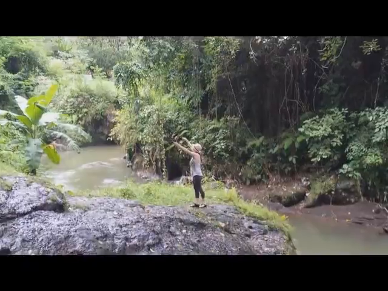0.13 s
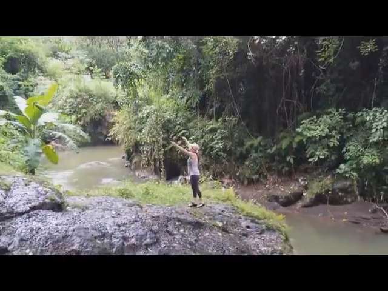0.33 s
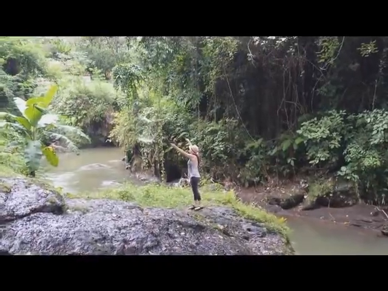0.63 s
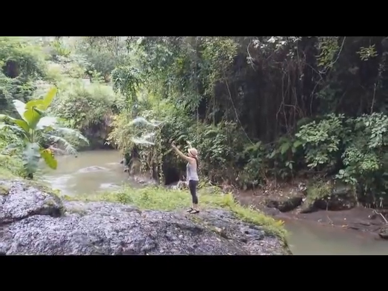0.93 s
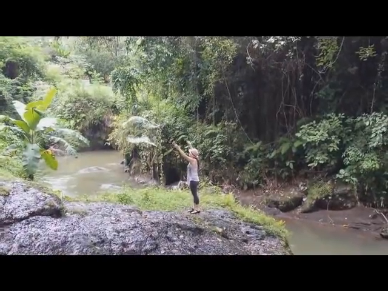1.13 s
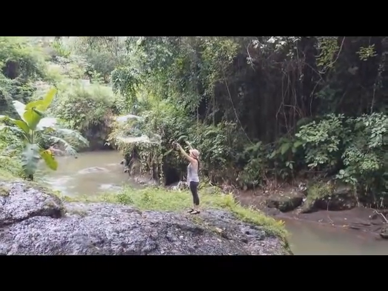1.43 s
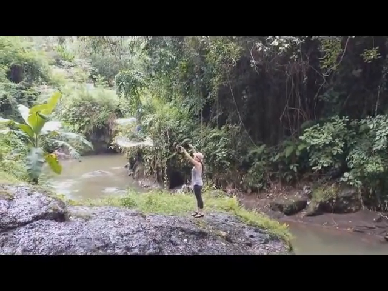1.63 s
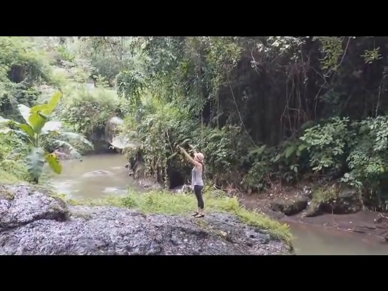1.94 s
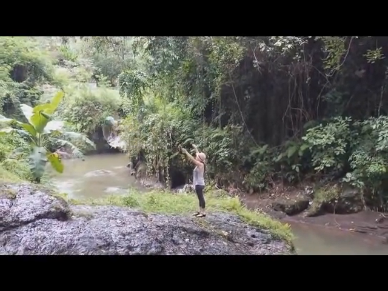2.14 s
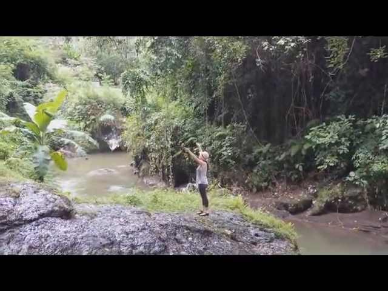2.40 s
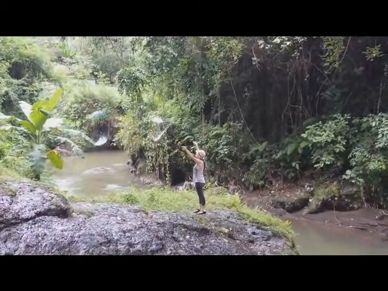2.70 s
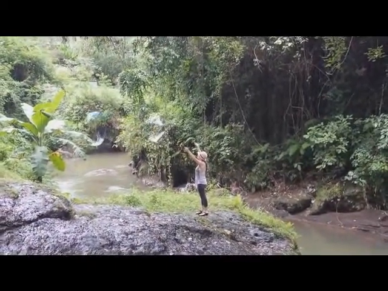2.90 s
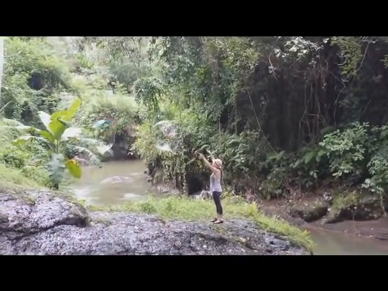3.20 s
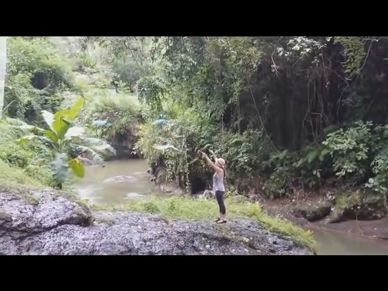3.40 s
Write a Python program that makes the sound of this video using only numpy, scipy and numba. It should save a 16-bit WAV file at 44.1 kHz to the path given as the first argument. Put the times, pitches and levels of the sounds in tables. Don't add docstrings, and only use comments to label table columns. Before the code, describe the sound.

A river rushes without pause through a leafy gorge, a dense wide roar with fine bubbly fizz. After about a second it brightens slightly; tiny splashes barely stand out. Wide stereo, handheld camera microphone.

```python
import sys
import numpy as np
from scipy import signal
from scipy.fft import rfft, irfft
from scipy.io import wavfile
from scipy.ndimage import uniform_filter1d
from numba import njit

SR = 44100
rng = np.random.default_rng(int(sys.argv[2]) if len(sys.argv) > 2 else 0)


def dump_mix(stems):
    frames = np.atleast_2d(stems).T
    limited = np.clip(frames, -1, 1)
    pcm = np.round(limited * 32767).astype(np.int16)
    wavfile.write(sys.argv[1], SR, pcm)


def volts_from_decibels(level):
    exponent = np.asarray(level, float) / 20
    return 10 ** exponent


N = 156555

# start in seconds, peak level in dB, centre in Hz.
SPLASH_EVENTS = [(.339, -24, 6500), (.499, -24, 7200), (.67, -26, 2300), (.9255, -17.5, 4800),
                 (.9305, -22, 4640), (1.249, -22, 6140), (1.64, -26.5, 3000), (1.649, -23, 7800),
                 (1.959, -21.5, 5020), (2.069, -17.5, 6440), (2.32, -19.5, 8500), (2.334, -21, 5550),
                 (2.864, -21, 8560), (2.959, -17.5, 5700), (3.074, -21, 5260), (3.272, -21.5, 8300),
                 (3.529, -17.5, 5450)]
# frequency in Hz, share 0-1.
UPSTREAM_SHARE = [(300, .05), (1400, 0.12), (1800, 0.41), (2200, 0.96), (6000, 0.72)]
# frequency in Hz, share 0-1.
DIRECT_SHARE = [(60, 0.69), (250, 0.92), (850, 0.61), (1400, 0.69), (2300, 0.57), (3600, 0.19), (6000, 0.3),
                (12000, 0.4)]
# frequency in Hz, gain in dB.
LEFT_COLOUR = [(170, -5), (1200, -5), (2100, -1), (3300, -8.5), (5000, 1), (6300, -0.5), (10300, -9.5),
               (12000, -10.5)]
# frequency in Hz, gain in dB.
RIGHT_COLOUR = [(150, -4.5), (700, -3), (1500, -5.5), (4000, -5), (6000, -2.5), (8400, 0.5), (10500, -2),
                (13000, -6)]
# frequency in Hz, gain in dB.
LEFT_BEFORE_BRIGHTENING = [(300, 0.5), (5000, -1), (7000, -0.5), (9000, -2.5), (12000, -5.5)]
# frequency in Hz, gain in dB.
RIGHT_BEFORE_BRIGHTENING = [(300, -1.1), (5000, -0.13), (8500, -0.37), (12000, -1.2)]
# time in seconds, share brightened 0-1.
BRIGHTENING = [
    (0, 0),
    (.6, 0.04),
    (.8, 0),
    (1.1, 0),
    (1.6, 0.77),
    (2.0, 1),
    (2.8, 0.72),
    (3.55, 0.8),
]
# time in seconds, level gap in dB.
MERGE_GAP = [(.67, 3), (1.4, 4.0), (1.93, 4.5), (1.96, 7), (3.55, 7.0)]

RIVER_DB, FIZZ_DB = -26.5, -4
SURGE_DB, PATCH_DB, FLICKER_DB = 0.23, 0.77, 1.6
BUBBLES_PER_S, CANDIDATES_PER_S = 3500, 4000
BUBBLE_CYCLES, BUBBLE_SPREAD_DB, BUBBLE_RISE_SHARE = 8, 1.88, 0.28
SPLASH_DB, SPLASH_DECAY_S, SPLASH_WIDTH_SHARE = -8, 0.012, 0.32
GULP_S, GULP_HZ, GULP_DB, GULP_DECAY_S = 1.961, 310, -30, 0.005
UP_LAG_S, DOWN_LAG_S = 0.00041, -0.00033
UP_LEAD_RAD = 0.9
BASS_CUT_HZ, BASS_SHELF_HZ, BASS_SHELF_DB = 73, 143, -3.5
OPEN_S, OPEN_RISE_S = 0.0368, 0.014
JOINT_HZ, CENTRE_TOP_HZ, TOP_HZ = 4000, 9700, 12980
MERGE_FROM_S, CENTRE_SHARE = 0.665, 0.68
STARVE_S, STARVE_DB, MASK_DB = 1.9, -7.5, -14


def water_roar(surge_db):
    roar, patch = 0, walk(4.1)
    for hz in 40 * 2 ** np.arange(0, 8.6, 1 / 3):
        patch = unit(0.8 * patch + 0.6 * walk(12))
        band = band_noise(hz, hz / 3)
        roar = roar + band * volts_from_decibels(surge_db + PATCH_DB * patch + FLICKER_DB * walk(34.8))
    return unit(roar)


def bubble_fizz():
    count = int(CANDIDATES_PER_S * N / SR)
    when, pitch, size_draw, length, chance = rng.random((count, 5)).T
    hz = 150 + 13000 * pitch
    kept = np.clip((BUBBLES_PER_S / CANDIDATES_PER_S - chance) * 20, 0, 1)
    size = volts_from_decibels(-BUBBLE_SPREAD_DB * np.log(1 - size_draw)) * np.sqrt(hz) * kept
    cycles = BUBBLE_CYCLES * (0.5 + length)
    start = (when * N).astype(np.int64)
    return unit(rings(start, hz, size, cycles, 1.0 * BUBBLE_RISE_SHARE, N))


@njit
def rings(start, hz, size, cycles, rise, count):
    y = np.zeros(count)
    for k in range(len(start)):
        tau = cycles[k] * SR / hz[k] / 3
        w = 2 * np.pi * hz[k] / SR
        z = 1.0 + 0j
        step = np.exp(1j * w - 1 / tau)
        glide = np.exp(1j * w * rise / (3 * tau))
        for n in range(min(int(5 * tau), count - start[k])):
            y[start[k] + n] += size[k] * z.imag
            z *= step
            step *= glide
    return y


def white_water(surge_db):
    return unit(water_roar(surge_db) + volts_from_decibels(FIZZ_DB) * bubble_fizz() * volts_from_decibels(surge_db))


def splashes(t):
    out = 0
    for start_s, peak_db, hz in SPLASH_EVENTS:
        age = np.clip(t - start_s, 0, None) / SPLASH_DECAY_S
        envelope = (t > start_s) * np.minimum(age * 4, 1) * np.exp(-age)
        spray = unit(band_noise(1.0 * hz, SPLASH_WIDTH_SHARE * hz))
        out = out + volts_from_decibels(peak_db + SPLASH_DB) * envelope * spray
    return out


def gulp(t):
    age_s = t - GULP_S
    return volts_from_decibels(GULP_DB) * np.cos(2 * np.pi * GULP_HZ * age_s) * np.exp(-(age_s / GULP_DECAY_S) ** 2)


def river_at_ports(up, down, hz):
    share = np.clip(over_hz(UPSTREAM_SHARE, hz), 0, 1)
    up, down = np.sqrt(share) * up, np.sqrt(1 - share) * down
    up_shift = np.exp(-2j * np.pi * hz * UP_LAG_S) * np.exp(-1j * UP_LEAD_RAD)
    down_shift = np.exp(-2j * np.pi * hz * DOWN_LAG_S)
    return up * up_shift + down * down_shift, up + down


def bass_cut(hz):
    high_pass = 1 / np.sqrt(1 + (BASS_CUT_HZ / (hz + 1)) ** 6)
    return high_pass * volts_from_decibels(BASS_SHELF_DB / (1 + (hz / BASS_SHELF_HZ) ** 8))


def unit(x):
    return x / np.sqrt(np.mean(x ** 2))


def over_hz(table, hz):
    p = np.array(table, float)
    return np.interp(np.log(hz + 1), np.log(p[:, 0]), p[:, 1])


def walk(rate_hz):
    k = int(SR / rate_hz)
    held = np.repeat(rng.standard_normal(N // k + 1), k)
    return unit(uniform_filter1d(uniform_filter1d(held, k), k)[:N])


def band_noise(hz, width_hz):
    return svf(svf(rng.standard_normal(N), hz, width_hz), hz, width_hz)


@njit
def svf(x, hz, width):
    y, b, l = np.empty(len(x)), 0., 0.
    g, k = np.tan(np.pi * hz / SR), width / hz
    for i in range(len(x)):
        v = (b + g * (x[i] - l)) / (1 + g * (g + k))
        b, l, y[i] = 2 * v - b, l + 2 * g * v, k * v
    return y


def scene():
    count = N + 45
    t = np.arange(count) / SR
    hz = np.arange(count // 2 + 1) * SR / count
    surge_db = SURGE_DB * walk(5.86)
    stretches = []
    for _ in range(4):
        z = rfft(white_water(surge_db), count)
        stretches.append(z / uniform_filter1d(abs(z), size=900))
    up, down, bank_left, bank_right = stretches
    left, right = river_at_ports(up, down, hz)
    direct = np.clip(over_hz(DIRECT_SHARE, hz), 0, 1)
    bright_share = np.interp(t[:N], *np.array(BRIGHTENING, float).T)
    ports = []
    for near, bank, colour, early in ((left, bank_left, LEFT_COLOUR, LEFT_BEFORE_BRIGHTENING),
                                      (right, bank_right, RIGHT_COLOUR, RIGHT_BEFORE_BRIGHTENING)):
        mixed = np.sqrt(direct) * near + np.sqrt(1 - direct) * bank
        port = mixed * volts_from_decibels(over_hz(colour, hz)) * bass_cut(hz)
        brighter = irfft(port, count)[:N]
        duller = irfft(port * volts_from_decibels(over_hz(early, hz)), count)[:N]
        ports.append(bright_share * brighter + (1 - bright_share) * duller)
    return unit(np.array(ports)) * volts_from_decibels(RIVER_DB) + splashes(t[:N]) + gulp(t[:N])


def band_power(z):
    return uniform_filter1d(np.sum(abs(z) ** 2, axis=-2), size=3, axis=-1) + 1e-20


def merge(x):
    frame = dict(fs=SR, window=np.sin(np.pi * (np.arange(2048) + 0.5) / 2048), nperseg=2048)
    hz, t, z = signal.stft(x, **frame)
    limit_db = np.interp(t, *np.array(MERGE_GAP, float).T) * (t > MERGE_FROM_S)
    edges = np.r_[np.arange(60, 188, 4), np.arange(188, 640, 20)]
    for lo, hi in zip(edges, edges[1:]):
        band = z[:, lo:hi]
        mid, side = band[0] + band[1], band[0] - band[1]
        mid_power = band_power(mid)
        left, right = band_power(band)
        if hz[lo] < JOINT_HZ:
            side_power = band_power(side)
            weak = mid_power < side_power * volts_from_decibels(2 * STARVE_DB)
            very_weak = mid_power < side_power * volts_from_decibels(3 * STARVE_DB)
            starved = weak & ((t > STARVE_S) | very_weak)
            z[:, lo:hi] = np.where(starved, np.array([side, -side]) / 2, band)
            continue
        gap_db = abs(10 * np.log10(left / right) + 0.8 * rng.standard_normal(len(t)))
        centred = gap_db < CENTRE_SHARE * limit_db * (hz[lo] < CENTRE_TOP_HZ)
        powers = np.where(centred, (left + right) / 2, np.array([left, right]))
        shared = mid * np.sqrt(powers / mid_power)[:, None]
        z[:, lo:hi] = np.where(gap_db < limit_db, shared, band)
        line_power = uniform_filter1d(abs(z[0, lo:hi]) ** 2, size=5, axis=0)
        z[0, lo:hi] *= line_power > right / (hi - lo) * volts_from_decibels(2 * MASK_DB) * (hz[lo] > CENTRE_TOP_HZ)
    z[:, hz > TOP_HZ] = 0
    return signal.istft(z, **frame)[1][:, :N]


def low_pass(x):
    return signal.sosfilt(signal.butter(12, 13640, fs=SR, output="sos"), x)


def record(dry):
    opening = np.clip((np.arange(N) / SR - OPEN_S) / OPEN_RISE_S, 0, 1) ** 2
    return low_pass(merge(dry) * opening)


dry = scene()
out = record(dry)
dump_mix(out)
```